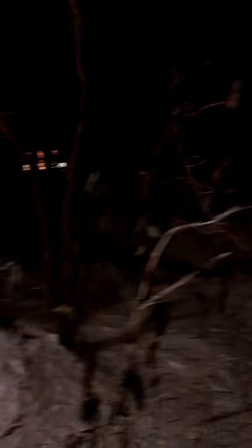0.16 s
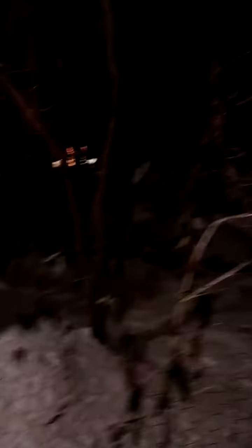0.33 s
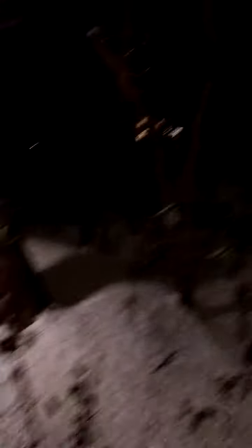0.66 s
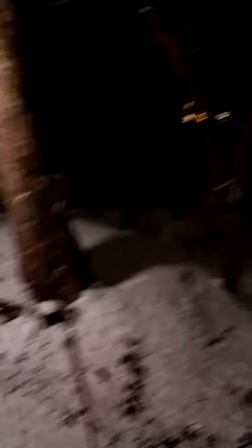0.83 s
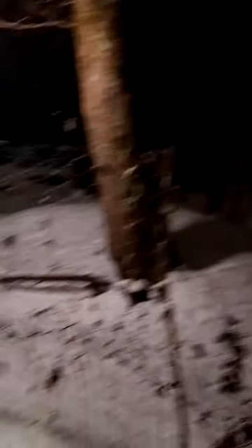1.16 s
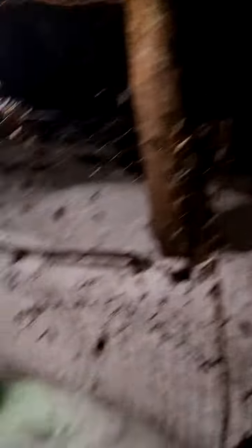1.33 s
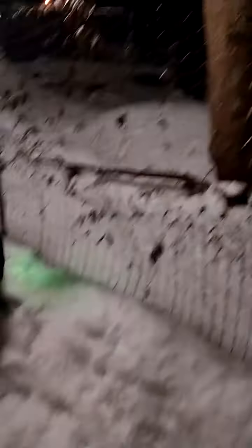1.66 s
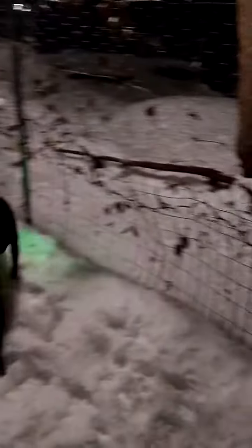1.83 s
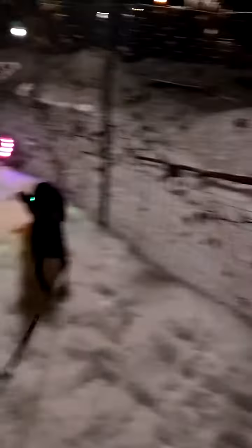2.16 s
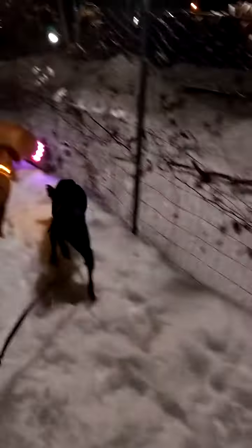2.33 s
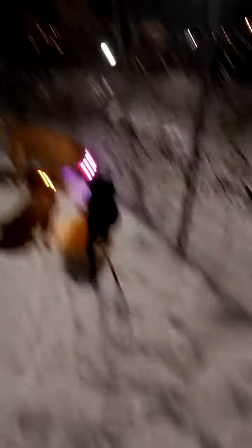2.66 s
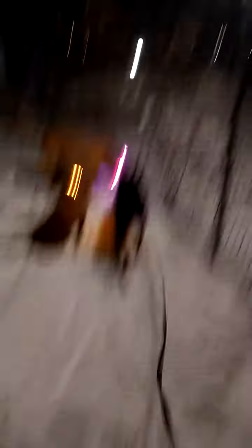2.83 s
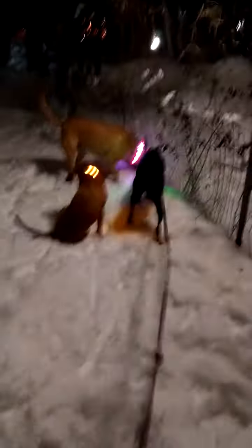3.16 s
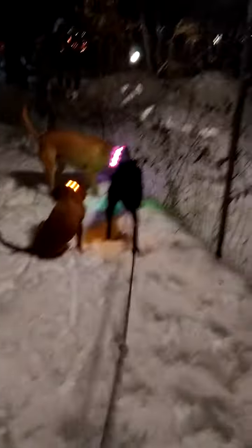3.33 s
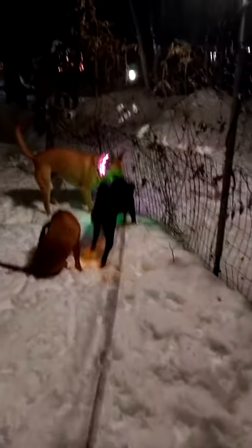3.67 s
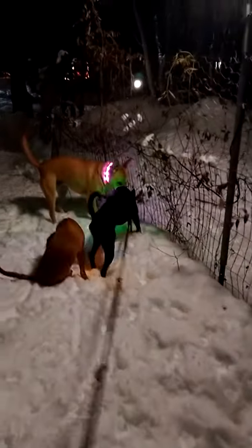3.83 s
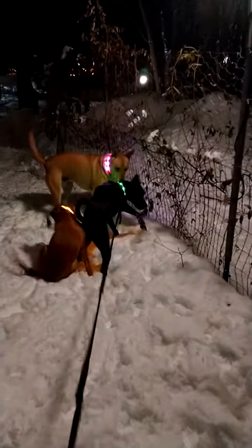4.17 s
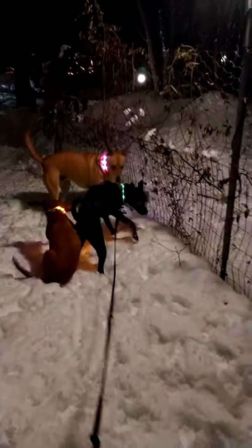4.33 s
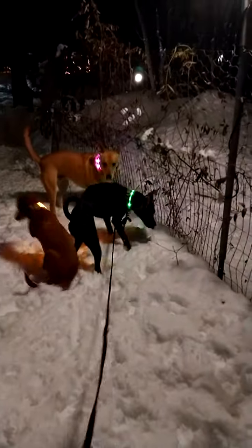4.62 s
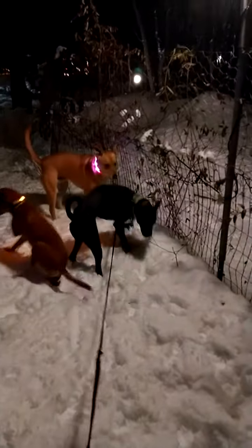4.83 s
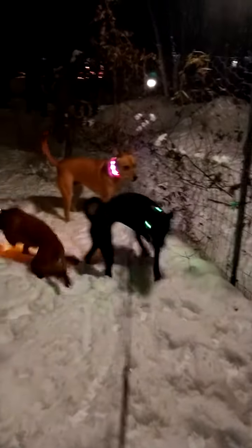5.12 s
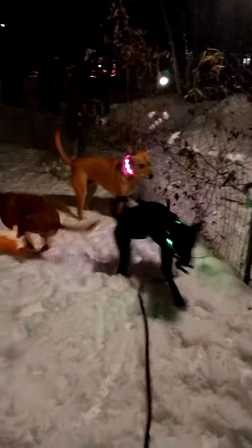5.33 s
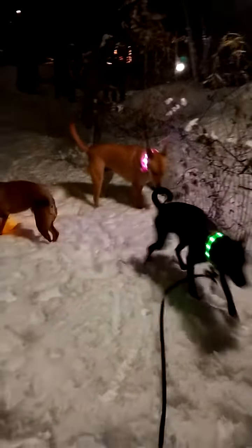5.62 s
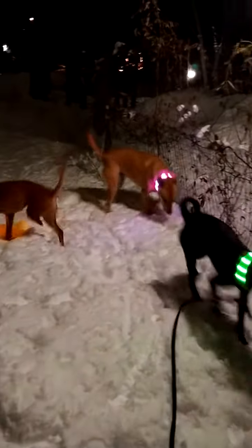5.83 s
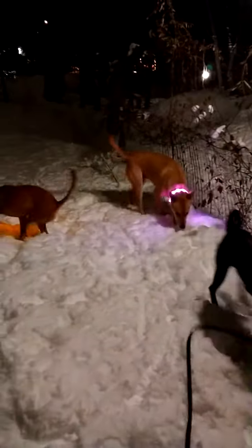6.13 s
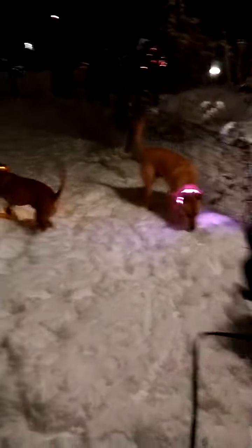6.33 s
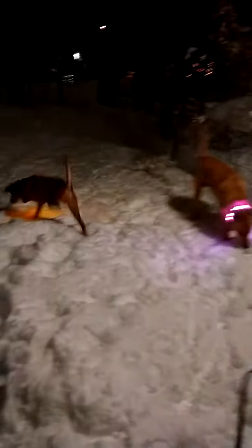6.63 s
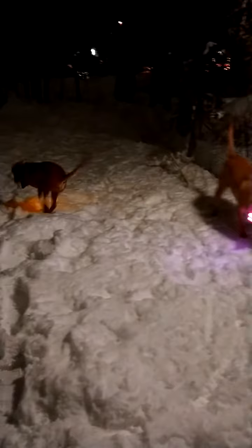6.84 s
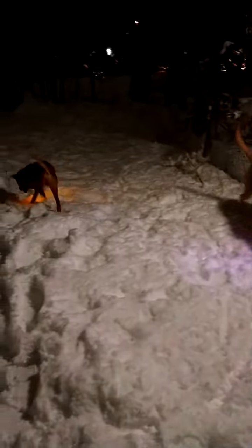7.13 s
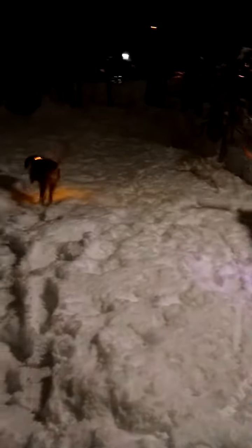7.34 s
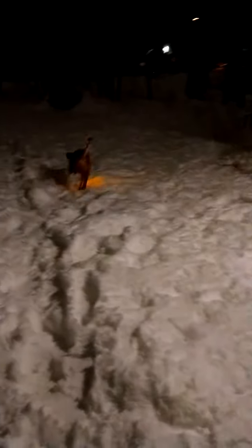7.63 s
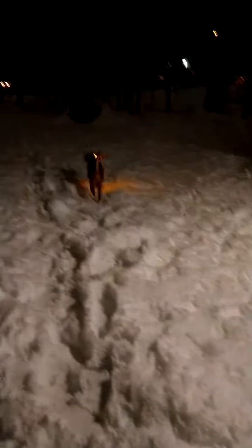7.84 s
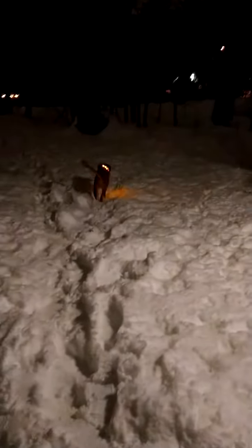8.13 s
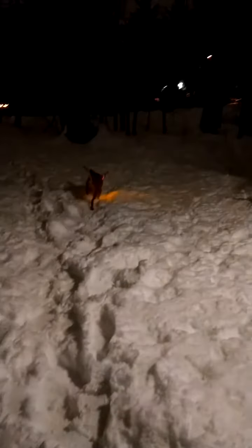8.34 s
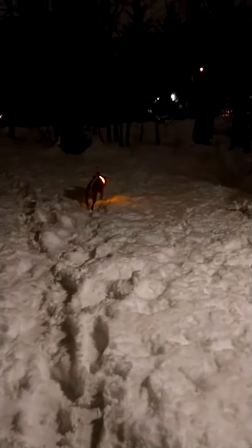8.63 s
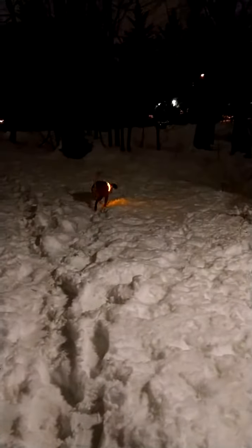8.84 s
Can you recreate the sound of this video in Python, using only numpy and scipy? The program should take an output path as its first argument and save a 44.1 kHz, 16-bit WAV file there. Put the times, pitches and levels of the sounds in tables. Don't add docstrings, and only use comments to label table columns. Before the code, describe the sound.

Outdoors on a quiet snowy night, a close handheld phone catches a jacket sleeve swishing as its wearer turns, with one brief high fabric squeak. Small metal dog tags jingle brightly, thickest just after two seconds, while boots crunch and thud into packed snow. Later the dogs wander off with scattered clinks, snow scuffs and ticks, fading toward a faint low town hum.

```python
import sys
import numpy as np
from scipy import signal
from scipy.fft import rfft, irfft, next_fast_len
from scipy.io import wavfile
from scipy.ndimage import uniform_filter1d

SR = 44100
rng = np.random.default_rng(int(sys.argv[2]) if len(sys.argv) > 2 else 0)


def invert_db(level):
    return 10 ** (np.asarray(level, dtype=float) / 20)


def master(y):
    cut = np.clip(np.atleast_2d(y).T, -1, 1)
    pcm = np.round(cut * 32767)
    wavfile.write(sys.argv[1], SR, pcm.astype(np.int16))


N = 396452
M = next_fast_len(N)
BINS_HZ = np.arange(M // 2 + 1) * SR / M

# (frequency [Hz], left minus right [dB])
PORTS = [(300, 0), (1300, -6), (2400, -9), (4400, -4.5), (8000, -18.5), (11000, -21), (15000, -22.5)]

# (frequency [Hz], density [dB/Hz])
TOWN = [(15, -43.5), (25, -10.5), (102, -4), (157, 0), (293, -0.5), (394, -6.5), (754, -9), (2110, -21.5),
        (5280, -23), (7710, -22.5), (12500, -29), (14800, -31.5), (16000, -32.5)]
# (frequency [Hz], left-right likeness [0-1])
TOWN_LIKENESS = [(60, 0.87), (130, 0.94), (290, 0.95), (640, 0.64), (1410, 0.38), (3100, 0), (6820, -0.17),
                 (15000, 0.3)]
# (time [s], level [dB])
TOWN_TURN = [
    (0, 1.8),
    (1, 1.5),
    (2.2, .8),
    (3.4, 0),
    (6, .3),
    (7.4, -.8),
    (9, -1.3),
]
# (frequency [Hz], width [Hz], level [dB])
HUM = [(248.5, .8, -82), (299.4, 17, -86.5)]

# (time [s], level [dB], hold [s])
SWISH = [(0, -65.5, 0.033), (.13, -77, 0.015), (.2, -69, .012), (.25, -63.5, 0.023), (.3, -56.5, 0.031),
         (.37, -64.5, 0.02), (.705, -56, 0.064), (1.1, -59, 0.026), (1.19, -46.5, 0.0078),
         (1.42, -62.5, 0.065), (1.49, -55.5, 0.036), (1.73, -65, 0.2), (2.17, -56.5, 0.11),
         (2.32, -52, 0.18), (2.595, -52, 0.03), (2.86, -57.5, 0.04), (3.18, -59.5, 0.2), (3.43, -72, 0.037)]
# (time [s], level [dB])
SWISH_REST = [
    (0, -72.5),
    (3.3, -66.5),
    (3.62, -78.5),
]
# (frequency [Hz], density [dB/Hz])
NYLON = [(1470, -42), (2500, -21), (3130, -20), (3310, -56), (3720, -16), (5350, -11), (8140, 6.5),
         (9510, 1.5), (12600, -21), (14300, -8.5), (15550, -5.5), (15900, -29.5)]

# (time [s], level [dB])
JANGLE = [(0, -72), (.6, -86), (.96, -73), (1.55, -80.5), (1.96, -71), (2.85, -74), (3.33, -69),
          (3.93, -85), (4.5, -77.5), (5.32, -71), (5.9, -72.5), (6.1, -77), (7.5, -89), (8.2, -106)]
# (frequency [Hz], t60 [s], level [dB])
RATTLE_MODES = [(2950, 0.092, -1), (3345, 0.12, 2.5), (4270, 0.026, 4.5), (5960, 0.1, 2),
                (6160, 0.13, -5.5), (8160, 0.09, -1.5)]

# (time [s], force [dB], nearness to rim [dB], disc flex [dB])
ROUND_CLINKS = [(0.0359, -47.5, -5, -21), (0.0489, -60, 8, -6), (0.4699, -83, 32.5, 22),
                (0.811, -62, 30.5, 22.5), (0.87, -59, 10.5, -1), (1.742, -54.5, 15.5, 4),
                (1.7857, -62.5, 25, 5), (1.8072, -59.5, 34, 4), (1.8148, -46, 14, 2),
                (1.8313, -43, -17, -6), (1.8421, -47, 14.5, -2), (1.8807, -64, 7, -6), (2.042, -52, 18, 12),
                (2.0743, -50.5, 11, -17), (2.1938, -87, 31, 16), (2.2395, -42.5, -18, -23),
                (2.3432, -44, 2, -19), (2.3701, -73, 29, 9), (2.4168, -37, -0.5, -10),
                (2.432, -45, 20, -25), (2.443, -53, 6, 18), (2.4568, -31, -0.5, -2),
                (2.4747, -32.5, -5, -2), (2.491, -44, 0, -10), (2.506, -38, -1, -21),
                (2.5173, -54, 15, -13), (2.64, -65, 25, 6), (3.1725, -66, -14, 5), (3.2186, -57, 20.5, 9),
                (3.2505, -49, 15.5, 7),
                (3.265, -33.5, 9, -1), (3.299, -40.5, 4, 0.5), (3.313, -40.5, 1, -13),
                     (3.3257, -41.5, 7, -14), (3.348, -45.5, 6, -25), (3.359, -36.5, -18, -17),
                     (3.378, -53, 7.5, -5), (4.7205, -37, -16, -15), (4.739, -45.5, -5, -16),
                     (4.966, -46, -2.5, -8.5), (5.22, -53.5, 3.5, -1), (5.2573, -58, 7.5, 6.5),
                     (5.3025, -51.5, 1, -7), (5.3275, -40, -19, -9), (5.4482, -42, 5, -17),
                     (5.7066, -49, -2, -16), (5.764, -45, -12, -14.5), (5.7967, -47, -8, -2.5),
                     (5.8494, -46, 5.5, -5.5), (5.8707, -27.5, -1, -14), (5.878, -45, 21, -16.5),
                     (5.887, -35, 10.5, -16.5), (6.4903, -50, 5, 2), (6.507, -38.5, -0.5, -13),
                     (6.5197, -34.5, 0, -13), (6.5445, -49, 13.5, -6), (7.338, -47.5, -28, -15),
                     (7.436, -42.5, -15, -9), (7.718, -63, -14, 2),
                (.003, -53.5, 6.5, -10), (.075, -59, 2, 3), (.9353, -59.5, 3, 0), (2.124, -49.5, -3, -17),
                 (3.204, -59, 14, -2), (3.395, -58, -9, -10), (4.13, -82, -2, 16), (4.6975, -62, -12, -6),
                 (5.1703, -74, 2, 13), (5.3419, -63, -12, 6), (5.3669, -70, 4, 19), (5.432, -61, -3, -10),
                 (5.74, -54, -1, -14), (5.773, -45, -9, -7), (5.896, -37.5, 4, -19),
                 (5.903, -47.5, -1, -13), (6.474, -66, 12, 0), (7.151, -62, -20, -14), (7.325, -82, 0, 20),
                 (7.351, -63, -19, -2), (7.552, -83, 0, 20)]
# (level [dB], share of rim [-], share of flex [-])
ROUND_LAW = [(-1, 0.14, 0.039), (-1, 0.039, 0.99), (2.5, 0.98, 0), (-9, 0.53, 0.28)]
# (frequency [Hz], t60 [s], left minus right [dB])
ROUND_MODES = [(4176, .14, -1), (5892, .2, -10), (10445, .07, -12), (11215, .1, -3)]
# (frequency [Hz], t60 [s], left minus right [dB])
ROUND_RING = [(3420, 0.025, -20.5)]
# (time [s], share of t60 [-])
ROUND_HANG = [(0, 0.55), (1.7, 0.98), (2.1, 0.31), (2.4, 1.08), (3.4, 2.1), (4.6, 0.82), (5.4, 0.3),
              (5.7, 0.67), (5.9, 0.27), (6.5, 0.72), (7.3, 0.7), (8.99, .35)]

# (time [s], level [dB], hold [s])
SCUFF = [(.02, -69.5, 0.046), (.13, -63.5, 0), (.26, -65, 0), (.71, -70, 0.14), (1.75, -73, 0.24),
         (3.78, -89, 0), (3.84, -72, 0.0035), (4.08, -74, 0), (4.29, -72, 0.027), (4.6, -68, 0),
         (5.0, -73, 0.047), (5.455, -63, 0), (5.52, -69, 0.052), (5.655, -63, 0.0009), (5.82, -72.5, .02),
         (5.87, -69, 0.029), (5.96, -76, 0), (6.33, -95, 0.027), (6.5, -62, 0.057), (6.8, -78.5, 0.05),
         (6.85, -82, .04), (6.94, -80.5, 0.099), (7.09, -68.5, 0.028), (7.155, -68.5, 0.033),
         (7.22, -77.5, 0.086), (7.3, -74, 0.044), (7.46, -73.5, .07), (7.64, -73, 0.016),
         (7.91, -82, 0.023), (8.285, -81.5, 0), (8.445, -79.5, 0.064), (8.76, -86, 0.043)]
# (time [s], level [dB])
SCUFF_REST = [(3.6, -78.5), (3.88, -74.5), (3.93, -88), (4.06, -83), (4.12, -78), (5.299, -80), (6.1, -77),
              (6.3, -71.5), (7.3, -77.5), (7.9, -88.5), (8.99, -89)]
# (frequency [Hz], density [dB/Hz])
POWDER = [(1470, -23.5), (2500, -15), (4210, -5.5), (4760, -7.5), (7890, -0.5), (9660, -2), (11700, -17),
          (14700, -6), (16000, -6.5)]

# (time [s], force [dB], nearness to tip [dB], lengthwise flex [dB])
LONG_CLINKS = [(0.4709, -48.5, -8, -16.5), (1.3022, -46, -61, -4), (1.5655, -39.5, -12, -31),
               (1.6028, -54, -10, -15), (1.8993, -48, -3, -1.5), (2.4232, -43, -6, -11),
               (2.593, -49, -17, -9), (2.6114, -50, 2, -24), (2.9394, -50.5, -5.5, -3),
               (3.1757, -39.5, -4.5, -13), (3.5568, -62.5, -28, 7.5), (4.5646, -46, -16, -7),
               (4.5939, -57.5, 0, -11), (5.37, -61, -7, -2), (5.6531, -58.5, 5, 1), (5.817, -56.5, -2.5, 0),
               (6.3885, -80.5, 16.5, 11), (6.5432, -44.5, 13.5, 1.5), (6.564, -56.5, 18.5, 4),
               (6.595, -58, 16.5, -13), (7.434, -60, -10, -10)]
# (time [s], force [dB], nearness to tip [dB], lengthwise flex [dB])
LONG_BRUSHES = [
    (.09, -67, 1, -15),
    (.905, -73, -22, 11),
    (1.352, -59, 1, -6),
    (1.93, -64.5, -13, 4.5),
    (3.505, -69, -6, 7.5),
    (4.38, -72, -5, 7),
    (4.899, -63, -17, -11),
    (5.199, -70, 1, 5),
    (5.34, -62.5, -9, 9),
    (7.084, -69, -26, 10),
]
# (level [dB], share of tip [-], share of flex [-])
LONG_LAW = [(6.5, 1.11, 0.015), (0.5, 0.06, 0), (-2, 1.3, 0.95), (-3, 0.36, 0.9), (0, 0.073, 0.94),
            (0.5, 1.04, 0.98), (-17.5, .3, 0.1)]
# (frequency [Hz], t60 [s], left minus right [dB])
LONG_MODES = [(9325, .16, -22), (8184, .2, -16), (14130, .11, -18), (3395, .2, -6), (6247, .2, -9),
              (5818, .14, -10), (11760, .12, -16)]
# (frequency [Hz], t60 [s], left minus right [dB])
LONG_RING = [(2966, 0.31, -8)]

# (time [s], level [dB], hold [s])
CRUNCH = [(.14, -79, .02), (.27, -73, .01), (.76, -76.5, 0.061), (1.1, -74, 0.025), (1.3, -76, 0.0083),
          (1.67, -81, 0.0045), (1.8, -92, 0.057), (2.45, -66, 0.053), (2.593, -60, 0.0029),
          (2.75, -61.5, 0.14), (4.28, -78, 0.096), (5.06, -86, 0.049), (6.8, -93, 0.027), (7.1, -80, 0.14),
          (8.29, -91, 0.009)]
# (time [s], level [dB])
CRUNCH_REST = [(0, -100), (1.6, -108.5), (2.4, -76), (3.3, -77), (4.001, -91), (6.2, -87.5), (7.2, -94),
               (8.99, -109)]
# (frequency [Hz], density [dB/Hz])
CRUST = [(180, -28), (300, 0.5), (939, -3), (2040, -4), (2970, -4), (3410, 3.5), (4300, -8.5), (7800, -35),
         (13200, -120)]

# (time [s], peak [dB], centre [Hz])
TICKS = [(.2004, -50, 8230), (.752, -34, 8560), (1.045, -42, 5960), (1.124, -43, 9500),
         (1.368, -39.5, 7900), (1.666, -42.5, 2300), (1.9, -43, 7000), (2.345, -41, 7890), (2.5, -42, 1500),
         (2.5902, -38, 5960), (2.672, -44, 8500), (2.702, -39, 7100), (2.9409, -39, 4160),
         (3.177, -39, 6000), (4.46, -54, 5960), (4.565, -47, 6000), (4.618, -38, 8000), (5.075, -41, 2720),
         (5.19, -51, 6000), (5.871, -45, 3800), (5.887, -50, 3600), (6.544, -33, 7040), (6.595, -42, 6500),
         (7.436, -48, 6000), (7.541, -65, 7000), (7.572, -59, 7000), (8.0177, -50.5, 4970),
         (8.182, -61, 8500), (8.343, -62, 8500), (8.282, -55, 5000), (8.4053, -54, 2980),
         (8.4232, -66, 4430), (8.5839, -52, 2180), (8.7221, -55, 7000)]
# (time [s], peak [dB], centre [Hz])
SNAPS = [(0.7836, -37, 10100), (1.0937, -37.5, 6460), (1.406, -46, 8150), (1.692, -46, 8000),
         (1.725, -41, 9000), (1.727, -45, 3350), (2.6394, -31, 9500), (2.643, -32.5, 7460),
         (2.6758, -30.5, 8450), (4.0846, -49, 8350), (4.3085, -60, 9080), (5.0639, -46, 3080),
         (5.6461, -50, 9200), (6.4248, -43.5, 5630), (7.154, -53, 7400), (7.5716, -51.5, 3360),
         (7.7983, -52, 4200), (8.2823, -57, 4460), (8.77, -49.5, 3320), (8.78, -50, 3300)]

# (time [s], pitch [Hz], level [dB])
SQUEAKS = [(1.04, 6200, -64), (1.07, 6200, -55), (1.098, 6250, -62), (1.103, 6600, -52), (1.14, 6760, -51),
           (1.147, 6890, -45), (1.172, 6930, -44), (1.182, 6950, -64), (1.195, 7050, -39),
           (1.25, 7020, -48), (1.283, 6950, -60)]
# (time [s], pitch [Hz], level [dB])
SQUEAKS_HIGH = [
    (1.15, 8400, -68),
    (1.172, 8550, -50),
    (1.19, 8400, -58),
    (1.22, 8400, -54),
    (1.248, 8300, -48),
    (1.26, 8250, -68),
]
# (time [s], pitch [Hz], level [dB])
SQUEAKS_THIN = [
    (.43, 14900, -69),
    (.46, 15330, -72),
    (.55, 15400, -67),
    (.65, 15500, -68),
    (.72, 15400, -66),
]

# (time [s], level [dB])
PACKING = [
    [(1.15, -69), (1.27, -68), (1.4, -79)],
    [(2.25, -76), (2.34, -61.5), (2.47, -64.5), (2.55, -92), (2.72, -59.5), (2.85, -54), (2.89, -60),
     (2.92, -72), (2.98, -75)],
    [(4.38, -77), (4.42, -82), (4.6, -75)],
]
# (time [s], peak [dB], centre [Hz])
THUDS = [(1.285, -52, 100), (2.315, -53, 150), (2.345, -51, 120), (2.465, -43.5, 310), (2.501, -41, 526),
         (2.59, -39.5, 370), (2.593, -47, 109), (2.675, -50, 140), (2.738, -44, 111), (2.76, -40, 484),
         (2.768, -41, 131), (2.81, -39, 600), (2.842, -40, 80), (2.884, -42, 200), (4.398, -56, 140),
         (4.405, -52, 90), (4.44, -59, 95), (4.462, -63, 100), (4.505, -59, 85.7), (8.585, -51.5, 171)]

# (time [s], mode 1 peak [dB], mode 2 peak [dB], mode 3 peak [dB])
FAR_CLINKS = [(5.615, -60, -85, -72), (5.655, -60, -85, -70), (6.655, -63, -85, -64),
              (7.1528, -63, -77, -55), (7.178, -59, -78, -54), (7.583, -67, -90, -66),
              (7.595, -53.5, -83, -58), (7.69, -65, -80, -69), (7.917, -64, -92, -69),
              (8.02, -57, -66, -60), (8.04, -63, -66, -60), (8.92, -77, -88, -77.5)]
# (frequency [Hz], t60 [s], left minus right [dB])
FAR_MODES = [(7601, .2, -6), (10500, .2, -4), (15140, .19, -8)]
# (frequency [Hz], t60 [s], left minus right [dB])
FAR_RING = [(3680, 0.024, -1.2)]


def on_hz(table):
    hz, value = np.transpose(table)
    return np.interp(np.log(BINS_HZ + 1), np.log(hz + 1), value)


def on_time(table, column, off=-120):
    rows = np.array(table)
    return np.interp(np.arange(N) / SR, rows[:, 0], rows[:, column], off, off)


def band_rms(spectrum, low_hz, high_hz):
    band = spectrum[(BINS_HZ > low_hz) & (BINS_HZ < high_hz)]
    return np.sqrt(2 * np.sum(np.abs(band) ** 2)) / M


def walk(rate_hz):
    hold = int(SR / rate_hz)
    steps = np.repeat(rng.standard_normal(N // hold + 1), hold)
    return 2.5 * uniform_filter1d(uniform_filter1d(steps, hold), hold)[:N]


def filtered(x, order, edge_hz, kind):
    return signal.sosfilt(signal.butter(order, edge_hz, kind, fs=SR, output="sos"), x)


def at_ports(spectrum, share, lag_s):
    left = invert_db(share * on_hz(PORTS))
    late = np.exp(-2j * np.pi * BINS_HZ * lag_s)
    both = spectrum * np.array([late * left, np.ones(len(BINS_HZ))]) * 2 / (1 + left)
    return irfft(both, M)[:, :N]


def town():
    swell = invert_db(0.6 * walk(3.59) + on_time(TOWN_TURN, 1))
    likeness = np.clip(on_hz(TOWN_LIKENESS), -.9, .97)
    colour = invert_db(on_hz(TOWN))
    mid, side, drone = (rfft(rng.standard_normal(N) * swell, M) for _ in range(3))
    mid = mid * colour * np.sqrt(1 + likeness)
    side = side * colour * np.sqrt(1 - likeness)
    hum = 0
    for hz, width_hz, db in HUM:
        hum = hum + invert_db(db) * np.sqrt(SR / width_hz) * drone / (1 + ((BINS_HZ - hz) / width_hz) ** 2)
    level = invert_db(-68) / band_rms(mid, 25, 1540)
    return irfft(level * np.array([mid + side, mid - side]) + hum, M)[:, :N]


def grains(spread_db, flicker_db, rate_hz):
    size_db = spread_db * np.minimum(rng.exponential(size=N), 5)
    size_db = size_db + flicker_db * walk(rate_hz) + .5 * flicker_db * walk(rate_hz / 4)
    x = rng.standard_normal(N) * invert_db(size_db)
    return x / x.std()


def strokes(events, rest, rise_db_s, fall_db_s, hold_s=0):
    t = np.arange(0, N, 32) / SR
    power = invert_db(np.interp(t, *np.transpose(rest), -120, -120)) ** 2
    for start_s, db, extra_hold_s in events:
        end_s = start_s + hold_s + extra_hold_s
        rise_db = rise_db_s * np.maximum(start_s - t, 0)
        fall_db = fall_db_s * np.maximum(t - end_s, 0)
        power = power + invert_db(db - rise_db - fall_db) ** 2
    return np.interp(np.arange(N) / SR, t, 10 * np.log10(power))


def rubbed(motion_db, colour, low_hz, high_hz, slips, share, apart, lag_s):
    scale = invert_db(motion_db) / band_rms(rfft(slips, M) * colour, low_hz, high_hz)
    own = 1 + apart * rng.standard_normal(N) * np.array([[1], [-1]])
    own = own / np.sqrt(1 + apart ** 2)
    return at_ports(rfft(slips * scale * own, M) * colour, share, lag_s)


def sleeve():
    motion_db = strokes(SWISH, SWISH_REST, rise_db_s=300, fall_db_s=260)
    return rubbed(motion_db, invert_db(on_hz(NYLON)), 7330, 7943, grains(1.3, 1.32, 220),
                  share=1.33, apart=0.94, lag_s=.0001)


def rattle():
    touches_per_s, spread_db = 110, 2.5
    touches = (rng.random(N) < touches_per_s / SR) * np.tanh(rng.standard_normal(N))
    touches = touches * invert_db(spread_db * np.tanh(rng.standard_normal(N)))
    ring = 0
    for hz, t60_s, db in RATTLE_MODES:
        ring = ring + invert_db(db) / np.sqrt(t60_s) / (2j * np.pi * (BINS_HZ - hz) + np.log(1000) / t60_s)
    return rubbed(on_time(JANGLE, 1), ring, 3100, 4400, touches, share=0.98, apart=0.94, lag_s=.0001)


def struck(clinks, law):
    rows, law = np.array(clinks), np.array(law)
    peaks_db = rows[:, 1:2] + law[:, 0] + rows[:, 2:] @ law[:, 1:].T
    return np.column_stack([rows[:, 0], peaks_db])


def tag(clinks, modes, ring_db, boost_db, tick_db, ring_mode, last, muffle_s,
        hang=((0, 1), (9, 1)), detune=0.0012, jolt_rad=.5, chatter_db=1.2):
    tick_hz, tick_s, takeover_s, port_turn_rad = 3400, 0.0028, 0.0011, 1.43
    out, rows = np.zeros((2, N)), np.array(clinks)
    hz, t60_s, left_db = np.transpose(modes)[:, :, None]
    peak_db = np.column_stack([rows[:, 1:], rows[:, ring_mode] + ring_db]) + boost_db
    starts = np.append((rows[:, 0] * SR - 40).astype(int), N)
    chance = rng.standard_normal((len(rows), 3, len(hz), 1))
    size = angle = np.zeros((len(hz), 1))
    for k, (drift, phase, lag) in enumerate(chance):
        t = np.arange(min(starts[k + 1] - starts[k], SR // 4)) / SR
        span = slice(starts[k], starts[k] + len(t))
        free = np.where(hz == hz[0], np.interp(rows[k, 0], *np.transpose(hang)), 1)
        old = np.exp(-(t / takeover_s) ** 2)
        decay = np.exp(-np.log(1000) * t / (last * free * t60_s) - (t / muffle_s) ** 2)
        size = invert_db(peak_db[k, :, None]) * decay * (1 - old) + size[:, -1:] * old
        angle = 2 * np.pi * hz * (1 + detune * drift) * t + jolt_rad * phase + angle[:, -1:]
        tick = np.exp(-t / tick_s) * np.sin(2 * np.pi * tick_hz * (1 + 0.039 * drift[0]) * t)
        tick = invert_db(peak_db[k, -1] + tick_db) * tick
        left = invert_db(left_db) * size * np.sin(angle + port_turn_rad + 0.039 * lag)
        out[0, span] += left.sum(axis=0) + 0.27 * tick
        out[1, span] += (size * np.sin(angle)).sum(axis=0) + tick
    chatter = invert_db(chatter_db * np.tanh(walk(240)))
    return filtered(out * chatter, 4, 2600, "high")


def round_tag():
    clinks = sorted(ROUND_CLINKS)
    return tag(struck(clinks, ROUND_LAW), ROUND_MODES + ROUND_RING, ring_db=-13, boost_db=2.73, tick_db=9.8,
               ring_mode=1, last=1.16, muffle_s=0.059, hang=ROUND_HANG, detune=0.0023, jolt_rad=0.46,
               chatter_db=2.5)


def scuff():
    motion_db = strokes(SCUFF, SCUFF_REST, rise_db_s=499.5, fall_db_s=244.5, hold_s=0.0028)
    return rubbed(motion_db, invert_db(on_hz(POWDER)), 6530, 7440, grains(1.1, 1.34, 120),
                  share=0.84, apart=1.0, lag_s=.0001)


def long_tag():
    clinks = sorted(LONG_CLINKS + LONG_BRUSHES)
    return tag(struck(clinks, LONG_LAW), LONG_MODES + LONG_RING, ring_db=-6.5, boost_db=4.5, tick_db=1.1,
               ring_mode=4, last=1.4, muffle_s=.075, detune=.0004, jolt_rad=.12)


def crunch():
    motion_db = strokes(CRUNCH, CRUNCH_REST, rise_db_s=454, fall_db_s=550)
    return rubbed(motion_db, invert_db(on_hz(CRUST)), 1300, 2600, grains(3.0, 1.3, 120),
                  share=.6, apart=.4, lag_s=.0005)


def knocks(events, cycles, hiss, boost_db, spread, spray_s):
    out, t = np.zeros(N), np.arange(2000) / SR
    sprays = rng.standard_normal((len(events), len(t)))
    for (start_s, db, hz), spray in zip(events, sprays):
        spray = filtered(spray, 2, [hz / spread, min(hz * spread, .4 * SR)], "band")
        ring = np.exp(-t * hz / cycles) * np.sin(2 * np.pi * hz * t)
        ring = ring + hiss * spray / spray.std() * np.exp(-(t / spray_s) ** 2)
        start = int(start_s * SR)
        out[start:start + len(t)] += invert_db(db + boost_db) * ring
    return out


def ticks_and_snaps():
    ticks = knocks(TICKS, cycles=0.52, hiss=0.54, boost_db=3.0, spread=1.7, spray_s=0.0027)
    snaps = knocks(SNAPS, cycles=9.0, hiss=0.23, boost_db=5.6, spread=1.65, spray_s=0.0036)
    return at_ports(rfft(ticks + snaps, M) * invert_db(0.42 * on_hz(POWDER)), 1.0, .0001)


def squeak(curve, left_db, octave_db=-120):
    hz = on_time(curve, 1, off=0) * (1 + .003 * walk(60))
    angle = 2 * np.pi * np.cumsum(hz) / SR
    level = np.sqrt(2) * invert_db(on_time(curve, 2) + 2.5 * np.tanh(walk(69.5)))
    tone = level * (np.sin(angle) + invert_db(octave_db) * np.sin(2 * angle))
    return tone * np.array([[invert_db(left_db)], [1]]) * 2 / (1 + invert_db(left_db))


def squeaks():
    return squeak(SQUEAKS, -16.5, octave_db=-19) + squeak(SQUEAKS_HIGH, -18.0) + squeak(SQUEAKS_THIN, -20.5)


def packing():
    db = np.max([on_time(step, 1) for step in PACKING], axis=0)
    lurch = filtered(grains(.8, 1.2, 90), 2, [60, 520], "band")
    return invert_db(db) * lurch / lurch.std()


def boot_weight():
    thuds = knocks(THUDS, cycles=0.6, hiss=0.15, boost_db=3.0, spread=2.5, spray_s=.004)
    low_cut = BINS_HZ ** 4 / (BINS_HZ ** 4 + 52 ** 4)
    return at_ports(rfft(thuds + packing(), M) * low_cut, 0.75, 0.0005)


def far_tag():
    return tag(FAR_CLINKS, FAR_MODES + FAR_RING, ring_db=-17, boost_db=7.9, tick_db=3.7,
               ring_mode=1, last=0.71, muffle_s=0.051)


def scene():
    tags = rattle() + round_tag() + long_tag() + far_tag()
    snow = scuff() + crunch() + ticks_and_snaps() + boot_weight()
    return town() + sleeve() + squeaks() + tags + snow


def roll_off(x):
    return signal.sosfilt(signal.butter(12, 15880, fs=SR, output="sos"), x)


def record(dry):
    top_hz = 15870
    mix = signal.sosfilt(signal.ellip(10, .2, 70, top_hz, fs=SR, output="sos"), dry)
    return roll_off(mix)


dry = scene()
out = record(dry)
master(out)
```